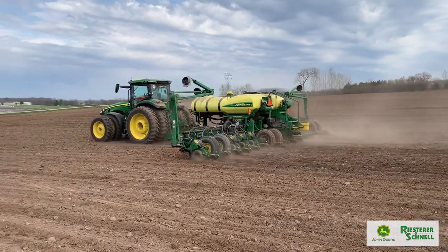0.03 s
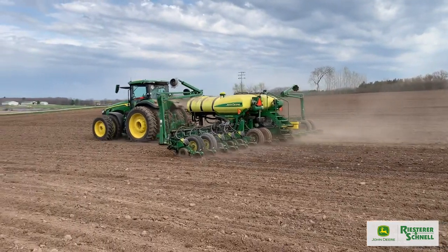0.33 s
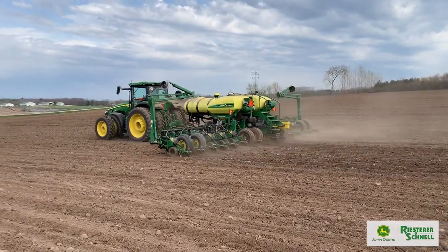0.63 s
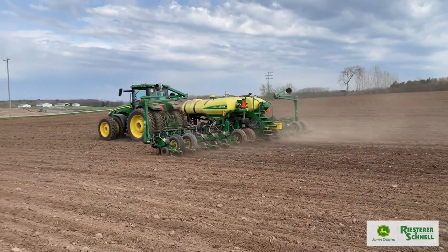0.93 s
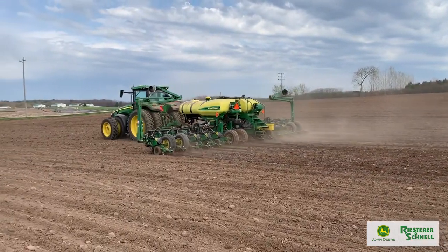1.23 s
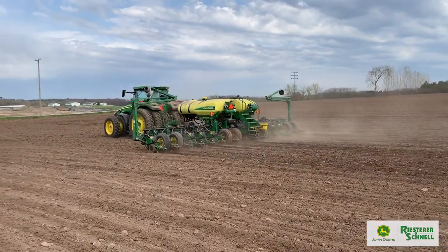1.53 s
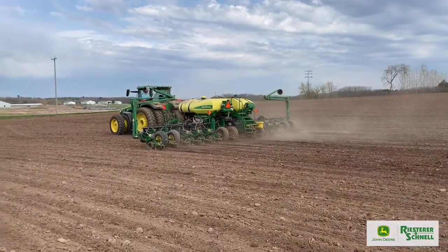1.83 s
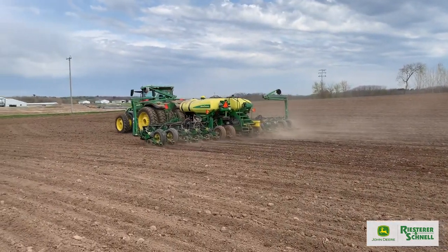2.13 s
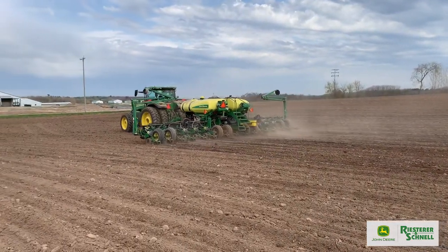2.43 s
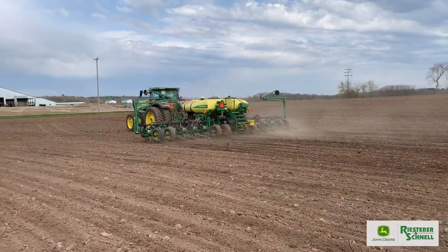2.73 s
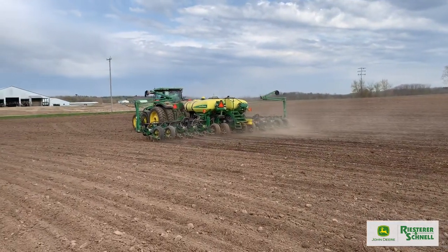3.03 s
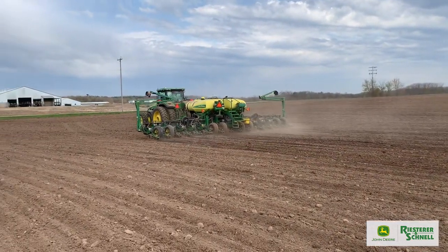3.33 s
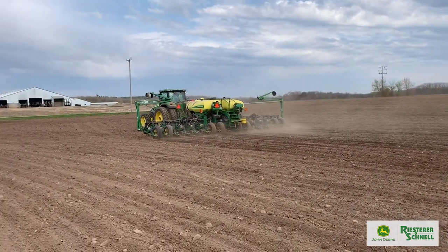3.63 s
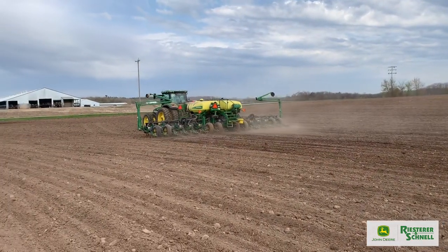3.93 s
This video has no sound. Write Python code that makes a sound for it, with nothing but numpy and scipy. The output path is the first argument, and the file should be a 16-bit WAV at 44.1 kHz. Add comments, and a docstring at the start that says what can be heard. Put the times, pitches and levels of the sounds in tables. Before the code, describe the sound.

A diesel tractor drones steadily, pulling a rattling, clinking seed planter through dry soil.

```python
"""Tractor pulling a seed planter

A diesel tractor drones and rumbles slowly away across a dry, tilled field. The planter's fan hums
and two hydraulic motors whine. Its row units (the parts that sow each row) rattle, clank and squeak,
loose links clink, discs scrape through hissing soil and stones tick on steel.
A few soft thumps and one hollow knock reach a closely spaced pair of microphones."""
import sys
import numpy as np
from scipy import signal
from scipy.fft import rfft, irfft, next_fast_len
from scipy.io import wavfile
from scipy.ndimage import uniform_filter1d, map_coordinates

SR = 44100
rng = np.random.default_rng(int(sys.argv[2]) if len(sys.argv) > 2 else 0)


def store_pcm(level_fs):
    """Save levels as 16-bit WAV."""
    pcm = np.round(np.clip(level_fs, -1, 1) * 32767).astype(np.int16)
    wavfile.write(sys.argv[1], SR, np.atleast_2d(pcm).T)


N = 176400

# The exhaust's tones (pitch [times the shaft speed], level next to the drone's [dB])
EXHAUST_TONES = [(3, -8), (3.5, -12.5), (5, -3.5), (5.5, -10.5), (6, -0.5), (7, -9), (9, -16), (18, -23.5)]
# How loud the drone is (time [s], level [dB])
DRONE_LEVEL = [(0, -31.5), (.7, -33.5), (1.3, -30.5), (1.9, -31.5), (2.45, -28.5), (3.1, -31), (4, -30.5)]
# The tone colour of the rumble and of the roar (frequency [Hz], relative level [dB])
RUMBLE_COLOUR = [(15, -46), (28, -32), (40, -19), (58, 1.5), (100, -2), (140, -5.5), (190, -3), (240, -6),
                 (330, -11), (600, -37), (2000, -80)]
ROAR_COLOUR = [(150, -4), (380, -9.5), (500, -2.5), (680, -1.5), (760, -2.5), (900, -1.5), (1100, 2.5),
               (1380, -9), (1750, -2.5), (2000, -10.5), (2200, -8), (2500, -20.5), (3000, -18.5),
               (4000, -21), (9000, -63)]
def tractor(rumble_db, roar_db):
    """The exhaust drones and throbs over a low rumble and a roar that pulses with each firing."""
    t = clock()
    throb_hz, throb_db = 7.1, 1.7
    shaft_hz = 24.7 * (1 + 0.0026 * wobble(3.09))
    drone_db = curves(DRONE_LEVEL)[0] + throb_db * np.sin(2 * np.pi * throb_hz * t + wobble(2.87))
    drone = sum(tone(k * shaft_hz, drone_db + db + 1.53 * wobble(9)) for k, db in EXHAUST_TONES)
    firing = np.cos(2 * np.pi * np.cumsum(3 * shaft_hz) / SR)  # three firings a turn
    rumble = amp(rumble_db + 0.71 * wobble(11)) * shaped(white(), RUMBLE_COLOUR)
    roar_gain = amp(roar_db + 0.56 * wobble(13)) * (1 + 0.064 * firing)
    roar = roar_gain * shaped(patchy(white(), depth_db=1.5), ROAR_COLOUR)
    return drone + rumble + roar


# The fan's hum (time [s], pitch [Hz], level [dB])
FAN_HUM = [(0, 557.8, -30), (.3, 557, -28.5), (1.1, 556.6, -28.5), (1.45, 556.4, -31), (1.75, 556.4, -36),
           (2, 557, -33.5), (2.4, 556, -40.5), (2.7, 555.5, -38.5), (3.4, 555, -36.5), (4, 554, -35)]
# Its tone an octave higher (time [s], level [dB])
FAN_OCTAVE_LEVEL = [(0, -34), (.5, -34), (1.2, -44), (2.5, -54)]
def fan():
    """The spinning blades make a hum and its octave, wavering in the open air."""
    hz, db = curves(FAN_HUM)
    octave_db, = curves(FAN_OCTAVE_LEVEL)
    hz = hz * (1 + 0.00084 * wobble(12))
    return tone(hz, db + 1.3 * wobble(7.32)) + tone(2 * hz, octave_db + 0.78 * wobble(7.6))


# Motors A and B (time [s], pitch A [Hz], level A [dB], pitch B [Hz], level B [dB])
MOTOR_WHINES = [(0, 801, -43, 809, -47), (.7, 778, -45, 814, -40), (1.4, 787.4, -39.5, 808, -35.5),
                (2.2, 781.3, -41, 811, -39), (3, 781.6, -39.5, 806, -42), (4, 782.5, -38.5, 808, -42)]
def hydraulics():
    """Two motors whine so close in pitch that together they flutter."""
    hz_a, db_a, hz_b, db_b = curves(MOTOR_WHINES)
    return sum(tone(hz * (1 + 0.00205 * wobble(14)), db + 1.3 * wobble(8))
               for hz, db in [(hz_a, db_a), (hz_b, db_b)])


# Where the steel frame rings (pitch [Hz], width [Hz], relative level [dB])
STEEL_RINGS = [(1667, 160, 2), (2258, 200, -3.5), (2860, 610, -3.5), (3390, 320, 2), (4244, 95, 0.5),
               (4870, 230, -9), (6750, 93, 1), (9450, 1100, -8)]
# Hard blows (time [s], level [dB])
CLANK_HITS = [(.038, -27), (.968, -28), (1.689, -20.5), (1.722, -26), (2.442, -29), (2.79, -30),
              (3.05, -28), (3.21, -28), (3.228, -28), (3.475, -25.5), (3.55, -31), (3.72, -29)]
# The tone colour of loose parts (frequency [Hz], relative level [dB])
JANGLE_COLOUR = [(1200, -30), (2300, -12), (2950, -3), (3400, 2), (3850, -6), (4250, 2), (4900, -8),
                 (7200, -12), (9000, -15), (15000, -40)]
def row_units(rattle_db):
    """A steady rattle rings the steel frame; harder clanks jangle the loose parts."""
    def steel(hz):
        rings = sum(amp(db) * 1j * hz * width / (pitch ** 2 - hz ** 2 + 1j * hz * width)
                    for pitch, width, db in STEEL_RINGS)
        return rings / (1 + (hz / 7500) ** 4)  # air and soft contacts dull the highs

    t = clock()
    shaking = amp(rattle_db) * patchy(impacts(rate=200, scatter_db=6, fade_s=0.12), depth_db=0.5)
    steel_gain = np.sqrt(np.mean(np.abs(steel(np.linspace(0, SR / 2, 2048))) ** 2))
    rattle = spread(shaking, steel) / steel_gain
    blows = sum((t >= s) * amp(db) * fade(np.abs(t - s), 0.074) for s, db in CLANK_HITS)
    return rattle + blows * shaped(patchy(white(), depth_db=2), JANGLE_COLOUR)


# Discs cutting lumps of earth (middle time [s], length [s], crunch level [dB], grit level [dB])
DISC_SCRAPES = [(0.03, 0.064, -33, -29.5), (0.302, 0.023, -31.5, -30), (0.674, 0.35, -39, -36.5),
                (1.052, 0.12, -27.5, -37), (1.726, 0.028, -30.5, -31.5), (2.78, 0.044, -31, -49),
                (3.436, 0.035, -27, -29)]
# The tone colour of the hiss and of the crunch (frequency [Hz], relative level [dB])
SOIL_COLOUR = [(800, -20), (2500, -5), (3100, -1), (4000, -4), (4700, -.5), (5900, 0), (6500, -1),
               (7100, 2), (7600, .8), (8600, 1.2), (9300, -1.5), (10300, -6.5), (11200, -5), (12400, -12.5),
               (13600, -14), (15500, -24)]
CRUNCH_COLOUR = [(400, -40), (1000, 4), (1600, 1.5), (2300, 4), (3400, -7.5), (6000, -25)]
def soil(hiss_db):
    """Dry soil hisses and crackles past the discs, swelling where they cut lumps."""
    grains = white() + amp(-3.5) * impacts(rate=160, scatter_db=4, fade_s=0.027)
    grains = patchy(grains, depth_db=2.5)
    crunch_gain = sum(amp(db) * swell(s, length / 2) for s, length, db, _ in DISC_SCRAPES)
    grit_gain = sum(amp(db) * swell(s, length / 2) for s, length, _, db in DISC_SCRAPES)
    crunch = crunch_gain * shaped(impacts(rate=300, scatter_db=3.5, fade_s=0.014), CRUNCH_COLOUR)
    hiss = amp(hiss_db + 0.077 * wobble(22.06)) * shaped(grains, SOIL_COLOUR)
    grit = grit_gain * shaped(impacts(rate=250, scatter_db=14.5, fade_s=0.021), SOIL_COLOUR)
    return hiss + crunch + grit


# Chains and loose links striking (time [s], pitch [Hz], level [dB])
LINK_HITS = [(.04, 2580, -25), (.06, 3445, -24), (.119, 4310, -28), (.211, 2325, -30), (.309, 2240, -27),
             (.463, 2580, -31), (.536, 3445, -26.5), (.594, 2325, -30), (.889, 3445, -27),
             (1.037, 2325, -24), (1.108, 2760, -28), (1.182, 4650, -30), (1.532, 2670, -28),
             (1.618, 2930, -31), (1.688, 3360, -16.5), (1.689, 4220, -17.5), (2.09, 2930, -31),
             (2.266, 4480, -31), (3.051, 3445, -30), (3.208, 3010, -29), (3.417, 2760, -26),
             (3.435, 2930, -26), (3.656, 2930, -31)]
def clinks(rattle_db):
    """Loose links strike and ring briefly; fainter ones fall at random near the frame's own pitches."""
    faint_per_s, detune = 42, 0.06
    t, out = clock()[:SR // 10], np.zeros((2, N + SR))
    envelope = np.sqrt(2) * fade(t, 0.09) * rise(t, 0.0025)
    buzz = jitter(depth_hz=55)
    pitches = [hz for hz, _, _ in STEEL_RINGS[1:5]]
    faint = []
    for when, which, tuning, softness in rng.random((int(faint_per_s * N / SR), 4)):
        hz = pitches[int(which * len(pitches))] * (1 + detune * (2 * tuning - 1))
        db = rattle_db[int(when * N)] + 6 - 11 * softness
        faint.append((when * N / SR, hz, db))
    for s, hz, db in LINK_HITS + faint:
        span = int(s * SR) + np.arange(len(t))
        phase = 2 * np.pi * (hz * t + buzz[:, span % N])
        overtone = amp(-17) * np.sin(1.46 * phase)
        out[:, span] += amp(db) * envelope * (np.sin(phase) + overtone)
    return spread(out[:, :N], np.ones_like)


# Stones hitting steel (time [s], level [dB], pitch [Hz])
STONE_HITS = [(0.764, -27, 11250), (1.181, -25, 9420), (1.24, -25, 7940), (1.91, -30, 7800),
              (2.051, -27, 11060), (3.64, -34, 11200), (2.441, -28.5, 7100), (3.225, -29, 8870)]
def stones():
    """Each stone gives a crack and a brief high ring."""
    t, out = clock(), np.zeros((2, N))
    crack = 0.96 * shaped(white(), [(2000, -18), (5000, -7), (9000, -4), (15000, -17)])
    for s, db, hz in STONE_HITS:
        age = np.maximum(t - s, 0)
        ring = np.sin(2 * np.pi * hz * age) * fade(age, 0.099)
        out += amp(db) * rise(age, 0.0005) * (ring + crack * fade(age, 0.068))
    return out


# Discs and joints squeaking (middle time [s], length [s], pitch [Hz], level [dB])
STEEL_SQUEAKS = [(.38, .03, 4330, -35), (0.65, 0.02, 4310, -31), (0.81, 0.022, 4240, -31),
                 (1.727, .018, 4170, -29), (2.08, .026, 3530, -30), (2.097, .04, 2070, -35),
                 (2.817, .018, 4570, -36)]
def squeaks():
    """Dry steel sticks and slips for a moment, so its pitch wavers."""
    t, out = clock(), np.zeros((2, N))
    slip = jitter(depth_hz=110)
    for s, length, hz, db in STEEL_SQUEAKS:
        span = slice(*np.searchsorted(t, [s - 2 * length, s + 2 * length]))
        envelope = np.sqrt(2) * amp(db) * swell(s, length / 2)[span]
        out[:, span] += envelope * np.sin(2 * np.pi * (hz * t[span] + slip[:, span]))
    return spread(out, np.ones_like)


# Soft thumps near the microphones (middle time [s], peak level [dB], pitch [Hz])
SOFT_THUMPS = [(0.017, -16, 139), (0.121, -13, 106), (0.286, -15, 107), (0.446, -18, 155),
               (.454, -12.5, 115), (0.596, -11.5, 75), (3.892, -22.5, 252), (3.899, -18, 138),
               (3.917, -13.5, 69.7)]
def thumps():
    """Low pushes of a wave or two, and one higher, hollow knock."""
    knock = (0.464, -15, 1045)
    return sum(amp(db) * swell(s, 0.0046) * -np.cos(2 * np.pi * hz * (clock() - s))
               for s, db, hz in SOFT_THUMPS + [knock])


# Boost or cut of the low treble (time [s], gain [dB])
LOW_TREBLE_GAIN = [(0, 4), (1.1, 1.5), (2, -2), (2.7, -2.5), (4, -0.5)]
def hollow(x, centre_hz=2360, width_hz=250):
    """The low treble is full at first and hollows out as the tractor moves off."""
    band = filtered(x, lambda hz: np.exp(-.5 * ((hz - centre_hz) / width_hz) ** 2))
    return x + (amp(curves(LOW_TREBLE_GAIN)[0]) - 1) * band


def amp(db):
    """Decibels to gain."""
    return 10 ** (np.asarray(db) / 20)


def unit(x):
    """Scale to an average (rms) level of 1."""
    return x / np.sqrt(np.mean(x ** 2) + 1e-20)


def clock():
    """Seconds at each sample."""
    return np.arange(N) / SR


def rise(age, rise_s):
    """Climb from 0 towards 1."""
    return 1 - np.exp(-age / rise_s)


def fade(age, fade_s):
    """Die away by 60 dB every fade_s seconds."""
    return amp(-60 * age / fade_s)


def swell(s, half_s):
    """A bell-shaped rise and fall around time s."""
    return np.exp(-.5 * ((clock() - s) / half_s) ** 2)


def along(points, hz):
    """Read between (frequency, value) points on a log scale."""
    frequencies, values = np.transpose(points)
    return np.interp(np.log(hz + 1), np.log(frequencies + 1), values)


def curves(rows):
    """One value per sample for each column after the time."""
    times, *columns = np.transpose(rows)
    return [np.interp(clock(), times, column) for column in columns]


def wobble(rate):
    """A smooth curve through rate random points a second."""
    return map_coordinates(rng.standard_normal(2048), [clock() * rate + 2], mode="wrap")


def jitter(depth_hz):
    """Two random phase drifts, in cycles, that roughen a pitch."""
    return depth_hz * np.cumsum([wobble(450), wobble(450)], axis=1) / SR


def tone(hz, db):
    """A pure tone following a pitch and a level."""
    return np.sqrt(2) * amp(db) * np.sin(2 * np.pi * (np.cumsum(hz) / SR + rng.random()))


def white():
    """Two unrelated noises."""
    return rng.standard_normal((2, N))


def impacts(rate, scatter_db, fade_s):
    """Noise made of small dying bursts of random size, about rate a second."""
    t = clock()[:SR // 2]
    hits = rng.random(N) < rate / SR
    sizes = amp(scatter_db * np.clip(rng.standard_normal(N), -2, 2))
    burst = fade(t, fade_s) * rise(t, 0.0047)
    power = signal.fftconvolve(hits * sizes ** 2, burst ** 2)[:N]
    return unit(np.sqrt(np.abs(power)) * white())


def patchy(pair, depth_db):
    """Make small patches of pitch and time randomly louder or softer."""
    spectra = signal.stft(pair, nperseg=512)[2]
    patches = uniform_filter1d(rng.standard_normal(spectra.shape[1:]), size=5, axis=0)
    patches = uniform_filter1d(patches, size=7, axis=1)
    return signal.istft(spectra * amp(depth_db * unit(patches)), nperseg=512)[1][:, :N]


def filtered(x, response):
    """Change each frequency's level and phase by response(hz)."""
    size = next_fast_len(N + SR // 2)
    hz = np.fft.rfftfreq(size, 1 / SR)
    return irfft(rfft(x, size) * response(hz), size)[..., :N]


def shaped(pair, colour):
    """Stereo sound of level 1 with the given tone colour."""
    return unit(spread(pair, lambda hz: amp(along(colour, hz))))


# How alike left and right are (frequency [Hz], likeness [0 to 1])
LIKENESS = [(40, .65), (130, .85), (400, .93), (1500, .92), (2000, .6), (2700, .45), (3300, .72),
            (4600, .4), (6000, .55), (7400, .7), (8400, .97), (15000, .92)]
def spread(pair, response):
    """Filter two unrelated signals and blend them into left and right."""
    def blend(hz):
        angle = np.arccos(np.clip(along(LIKENESS, hz), -1, 1)) / 2
        return response(hz) * np.array([np.cos(angle), np.sin(angle)])

    mid, side = filtered(pair, blend)
    return np.array([mid + side, mid - side])


# How loud the noises are (time [s], rumble [dB], roar [dB], rattle [dB], soil hiss [dB])
NOISE_LEVELS = [(0, -29, -27.5, -30, -31.5), (.6, -29.5, -28.5, -36, -32), (1.2, -32, -29, -31.5, -34.5),
                (1.7, -33.5, -29.5, -35.5, -33), (2.5, -34, -29.5, -38.5, -35.5),
                (3.3, -39, -30.5, -37.5, -34.5), (4, -35.5, -31.5, -37.5, -35)]
def scene():
    """Tractor and planter together in the open field."""
    rumble_db, roar_db, rattle_db, hiss_db = curves(NOISE_LEVELS)
    planter = fan() + hydraulics() + row_units(rattle_db) + soil(hiss_db) + stones()
    return hollow(tractor(rumble_db, roar_db) + planter) + clinks(rattle_db) + squeaks() + thumps()


# How far the left microphone is ahead (frequency [Hz], phase lead [radians])
LEFT_LEAD = [(1600, 0), (1950, 1), (2700, -.1), (3300, 1.7), (3900, .1), (5300, 2.4), (5800, 2.6),
             (6200, 0), (7400, -.8), (8000, -2.9), (9100, -3.2), (9600, -4.5), (10300, -6.28),
             (11800, -6.3), (12300, -7.3), (12500, -9.4)]
# The balance between the two (frequency [Hz], left minus right [dB])
BALANCE = [(380, 0), (560, -2.7), (800, -1.7), (1100, 0), (1750, -2), (2300, 0), (2900, -3), (3500, -2),
           (4300, -4.5), (5500, -6), (6500, 0)]
def record(dry, low_cut_hz=28.5, top_hz=15700):
    """Two microphones differ in timing and level, and lose the deepest and highest sounds."""
    def microphones(hz):
        left = amp(along(BALANCE, hz) / 2) * np.exp(.5j * along(LEFT_LEAD, hz))
        low_cut = hz ** 4 / (hz ** 4 + low_cut_hz ** 4)
        return np.array([left, 1 / left]) * low_cut * (hz < top_hz)

    return filtered(dry, microphones)


dry = scene()
out = record(dry)
store_pcm(out)
```